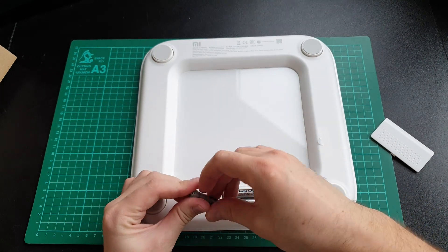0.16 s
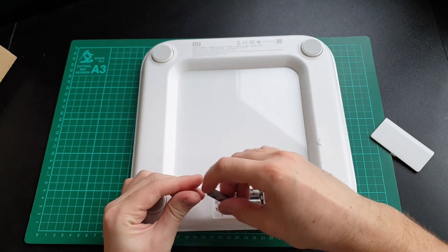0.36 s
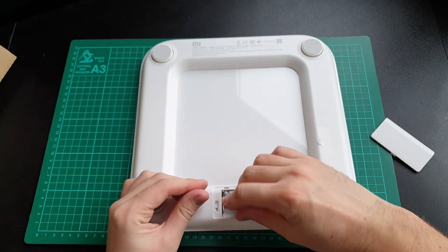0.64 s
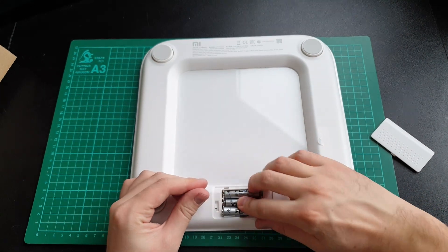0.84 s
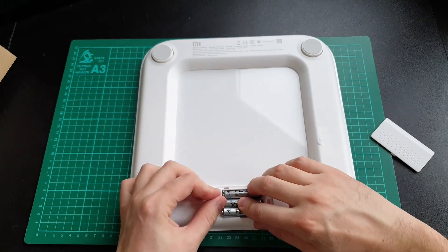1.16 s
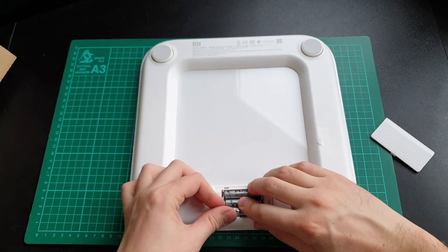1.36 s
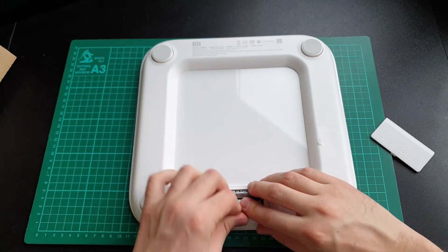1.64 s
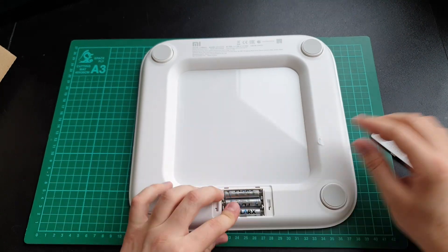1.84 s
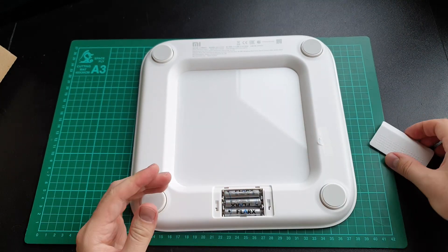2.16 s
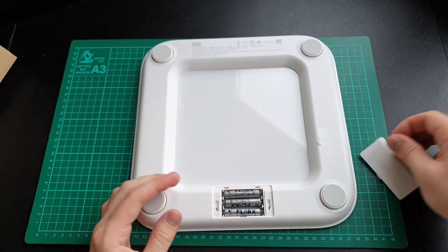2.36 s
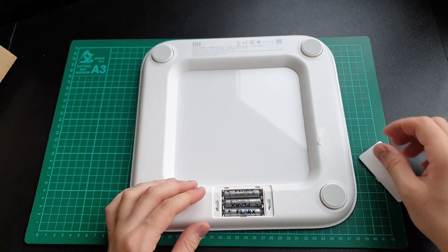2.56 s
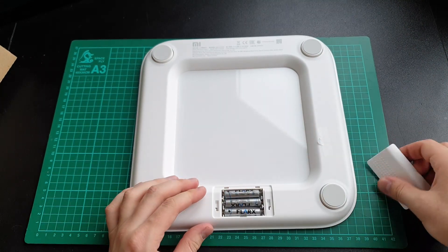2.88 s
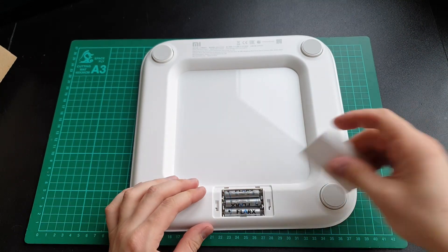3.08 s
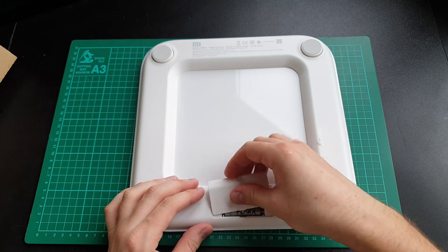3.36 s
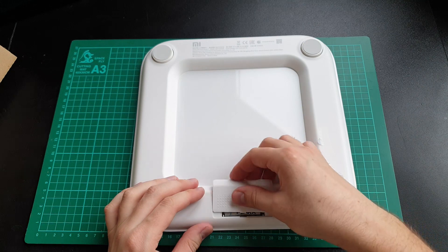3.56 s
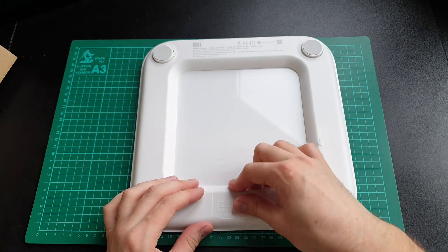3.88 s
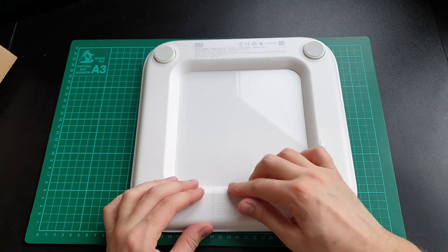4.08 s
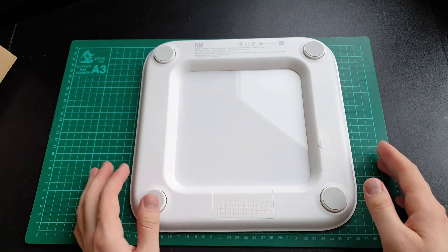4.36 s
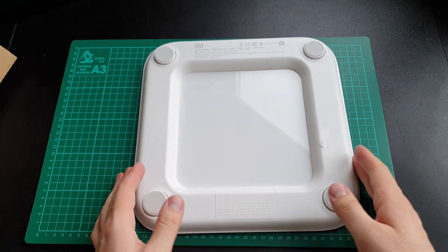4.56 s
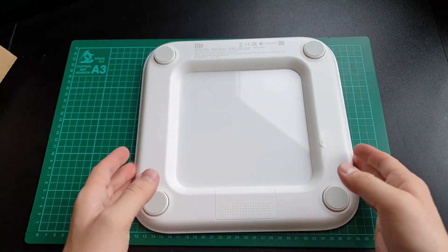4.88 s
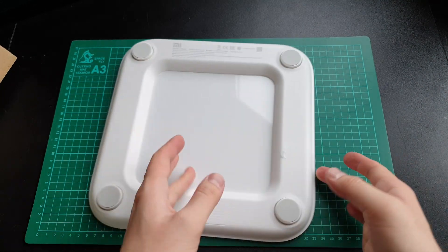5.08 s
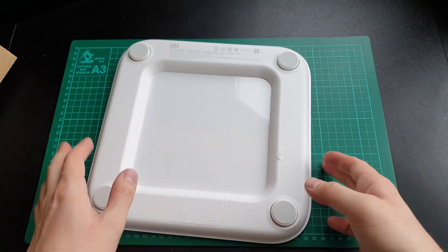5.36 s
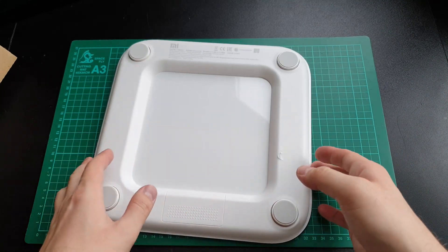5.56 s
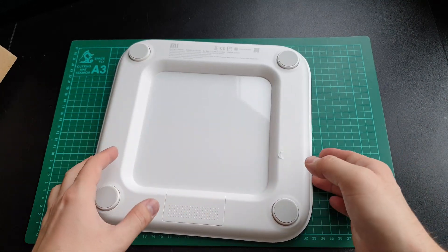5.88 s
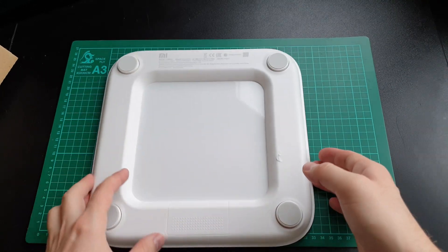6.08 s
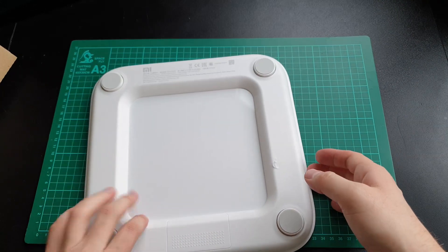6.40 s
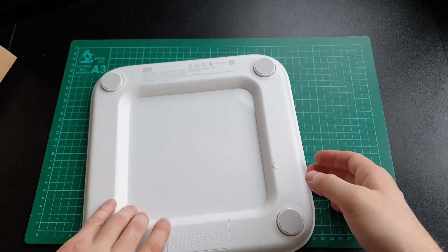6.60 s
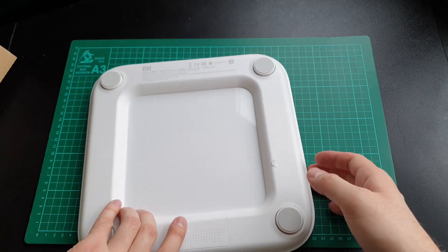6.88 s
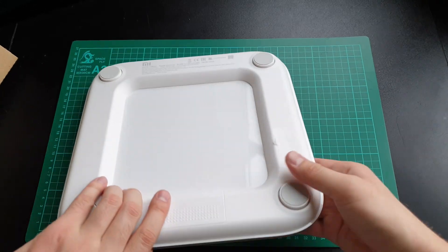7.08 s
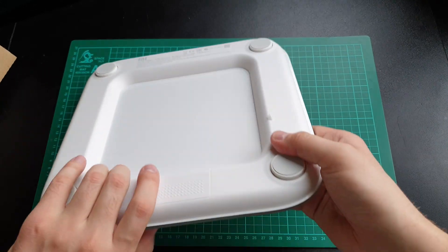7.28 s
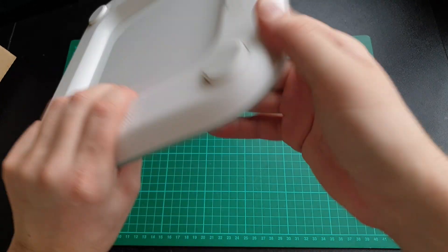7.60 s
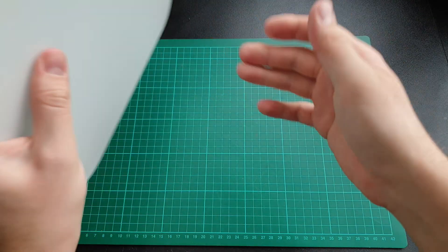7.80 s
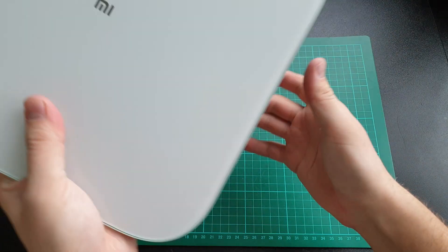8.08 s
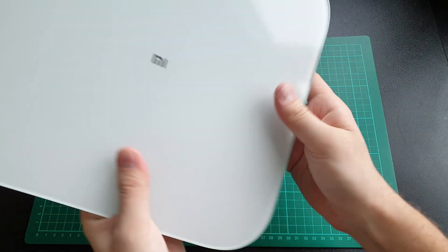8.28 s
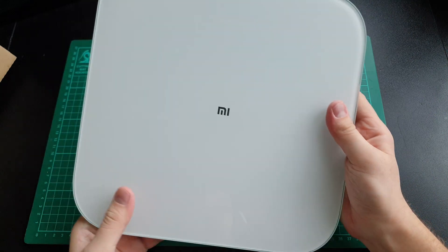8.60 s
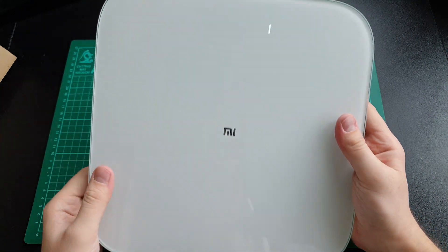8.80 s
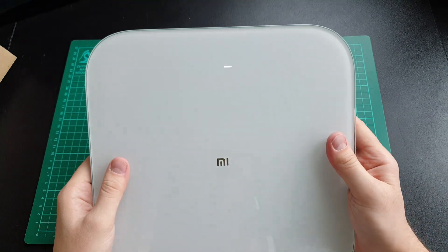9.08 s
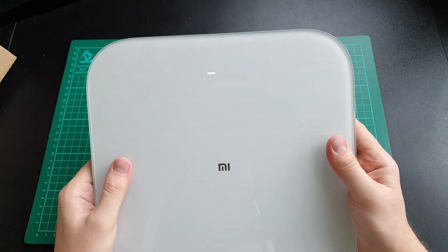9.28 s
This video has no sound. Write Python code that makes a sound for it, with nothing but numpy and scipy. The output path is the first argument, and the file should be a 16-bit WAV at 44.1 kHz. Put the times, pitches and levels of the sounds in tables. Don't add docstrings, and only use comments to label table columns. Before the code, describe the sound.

A close stereo microphone in a small room, with short echoes, faint hiss and low desk tremble. At 0.5 s a battery clicks in a hollow plastic shell, and at 0.7 s comes the loudest, hard springy snap. Smaller clicks follow, with brighter snaps at 1.5 and 1.7 s, and fingers rubbing near 2 s. At 2.25-2.4 s a thin lid is picked up in quick bright taps; light ticks and a swish reach 2.9 s. The lid is fitted from 3.3 s, clicks at 3.5 s and snaps loudly shut at 3.9 s. Around 4.6-5.1 s the case scrapes and bumps dully; at 5.65 s a rubber foot judders briefly on the mat. Soft rubbing and faint bumps continue. At 7.6 s a swish marks the lift, then rubbing and soft glassy knocks near 8.5 s, and a deep desk thump at 9 s before quiet.

```python
import sys
import numpy as np
from scipy import signal
from scipy.fft import next_fast_len
from scipy.io import wavfile
from scipy.ndimage import uniform_filter1d

SR = 44100
rng = np.random.default_rng(int(sys.argv[2]) if len(sys.argv) > 2 else 0)


def master_out(mix):
    frames = np.transpose(np.atleast_2d(mix))
    ceiling = np.clip(frames, -1, 1)
    pcm = np.round(ceiling * 32767).astype(np.int16)
    wavfile.write(sys.argv[1], SR, pcm)


def undo_db(level):
    steps = np.asarray(level, float) / 20
    return 10 ** steps


N = 416744


def evened(x):
    return x / np.sqrt(np.mean(x ** 2) + 1e-20)


def read(points, hz):
    f, value = np.transpose(points)
    return np.interp(np.log(hz + 1), np.log(f + 1), value)


def over_time(points):
    return np.interp(np.arange(N) / SR, *np.transpose(points))


def add(mix, s, sound):
    part = mix[..., round(s * SR):][..., :sound.shape[-1]]
    part += sound[..., :part.shape[-1]]


def band(x, lo_hz, hi_hz):
    edges_hz = [lo_hz, min(hi_hz, .45 * SR)]
    return signal.sosfilt(signal.butter(2, edges_hz, "band", fs=SR, output="sos"), x)


def rings(modes, length_s):
    t = np.arange(round(length_s * SR)) / SR
    total = np.zeros(len(t))
    for k, (hz, db, t60) in enumerate(modes):
        total += (-1) ** k * undo_db(db - 60 * t / t60) * np.sin(2 * np.pi * hz * t)
    return total


def struck(modes, db, upper_db=0, ring=1, rise_s=.0005):
    hit = [(hz, level + upper_db * (k > 0), t60 * ring) for k, (hz, level, t60) in enumerate(modes)]
    sound = rings(hit, .3)
    onset = 1 - np.exp(-np.arange(len(sound)) / SR / rise_s)
    return undo_db(db) * sound * onset ** 2


# pitch ratio, level in dB.
NEIGHBOURS = [(1, 0), (1.011, -3), (.984, -4), (1.029, -7), (.963, -8), (1.052, -11)]


def cluster(hz, db, t60, spread=1):
    return [(hz * ratio ** spread, db + level - 3.5, t60 * (1 - .08 * k))
            for k, (ratio, level) in enumerate(NEIGHBOURS)]


# frequency in Hz, likeness 0 to 1.
EAR_LIKENESS = [(60, 0.97), (300, 0.66), (640, 0.35), (1400, 0.027), (15000, 0.023)]


def pair(z):
    same = np.clip(read(EAR_LIKENESS, np.linspace(0, SR / 2, z.shape[1])), -1, 1)[:, None]
    return np.array([z[0], same * z[0] + np.sqrt(1 - same ** 2) * z[1]])


def noise(spectrum, size, patchy_db):
    hz = np.fft.rfftfreq(size, 1 / SR)
    used = hz < spectrum[-1][0]
    draws = rng.standard_normal((used.sum(), 4 * N // size + 5, 5), np.float32)
    a, b, c, d, patches = np.moveaxis(draws, 2, 0)
    for axis in (0, 1):
        patches = uniform_filter1d(patches, size=8, axis=axis)
    gain = undo_db(read(spectrum, hz[used])[:, None] + patchy_db * evened(patches))
    z = np.zeros((2, len(hz), a.shape[1]), np.complex64)
    z[:, used] = np.array([a + 1j * b, c + 1j * d]) * gain
    x = signal.istft(pair(z).astype(np.complex64), nperseg=size, noverlap=3 * size // 4)[1]
    return evened(x[:, :N])


def click(db, hz, crack_db, thud_db=-16.0):
    t = np.arange(2200) / SR
    air_db = -0.5 + 0.53 * crack_db + .35 * db
    rattle = rng.standard_normal((2, len(t))) * np.exp(-t / .004) * (1 - np.exp(-t / 0.00092))
    rattle[1] += (650.0 / hz) ** 3 * rattle[0]
    x = np.vstack([t == 0, rattle / np.linalg.norm(rattle, axis=1, keepdims=True)])
    peak = undo_db(np.array([[-17.], [0.], [0.]]) - 0.28 * db)
    hump = band(x, hz / 2.066, hz * 1.426) + peak * band(x, hz / 1.06, hz * 1.06)
    crack = undo_db(crack_db - 7.5) * band(x, 2400, 5500)
    air = undo_db(air_db - 17.0) * band(x, 7800, 24000)
    thud = undo_db(thud_db + 15.5) * band(x[[0, 1, 1]], 225, 560)
    return undo_db(db) * (hump - crack + air + thud) / np.linalg.norm(hump[0])


# start in seconds, peak in dB, shell pitch in Hz, sharpness in dB, weight in dB.
BATTERY_CLICKS = [(0.495, -24.5, 1296, -24.5, -13.5), (0.555, -31, 1180, -18, -54),
                  (0.689, -2.3, 1880, -13.5, -25.5), (0.76, -24, 1170, -39, -21.5),
                  (1.087, -40.5, 1050.0, -39, -12), (1.139, -33.5, 1010, -39, -42),
                  (1.343, -33, 1113, -12.5, -26), (1.543, -21.5, 1193, -2.5, -19),
                  (1.699, -17, 1450, -9.5, -14), (1.997, -43, 1220, -19, -33),
                  (2.038, -40, 1170, -21, -42.5), (2.065, -41.5, 1180, -12.5, -39)]
LID_SNAPS = [(2.248, -39, 1270, -23, -34), (2.308, -22, 2070, 1.5, -17), (2.353, -39, 960, 10, -13),
             (2.388, -21.5, 1162, 0.2, -17), (2.467, -39, 1300.0, -24.5, -12),
             (2.671, -41, 1050, -34.5, -14.5), (2.69, -44.5, 1196, 2.5, -7.5), (2.723, -32, 1087, -34, -32),
             (2.734, -35.5, 1090, -6.5, -12.5), (2.818, -47.5, 1340, -25, -7.5),
             (2.835, -45.5, 1140, -28, -36), (2.923, -43, 1580, 9, -14), (3.283, -27, 1140.0, 2.5, -27),
             (3.293, -27.5, 1314, -5, -12), (3.364, -39, 1100, -4, -30), (3.397, -35.5, 1540, -9, -28),
             (3.494, -17.5, 1560, -6.5, -53.5), (3.611, -38, 1330, 4, -52),
             (3.635, -41.5, 1297, -13.5, -20.5), (3.708, -33.5, 1060, -13, -21.5),
             (3.889, -8, 1070, -5.5, -21), (4.178, -42, 818.0, -30, -27)]
CASE_BUMPS = [(4.897, -36, 626, -9, 1.5), (4.988, -59.9, 724.0, -13.3, 4), (5.022, -35.5, 1100, -31, -21),
              (5.418, -62.5, 1281, 9.5, -10), (5.647, -44, 600, -40.5, -23),
              (5.6755, -38, 646.0, -30, -14.5), (5.704, -45, 640, -8.5, -7.5),
              (5.865, -58.5, 627, -16.5, -10.5), (6.058, -45, 585, -25.5, -21),
              (6.088, -39.5, 554, -27, -16.5), (6.198, -55.5, 1090.0, -7.5, -21),
              (6.84, -56, 1420, -25, -12), (6.927, -53, 1020, -13, -25), (7.167, -44.5, 1148, -10.5, -14),
              (7.269, -37, 1020, -29.5, -40.5), (7.465, -66, 1100, 7, -8), (8.097, -60, 2147, 14.5, -21.5),
              (8.26, -51.5, 1320.0, -5.5, -7.5), (8.368, -52, 1450.0, -13.5, -17),
              (8.494, -37.5, 1065, -2.5, -27), (9.013, -44, 1000, 0, -5)]
# start in seconds, peak in dB, pitch in Hz, sharpness in dB.
FAINT_TICKS = [(.648, -38, 1170, -21), (.662, -29.5, 1020, -35), (1.056, -59, 1000, -23),
               (1.074, -49, 1010, -25.5), (2.286, -35.5, 1240, 1), (2.379, -23.5, 1410, 4),
               (2.685, -49.5, 1360, -7.5), (2.91, -48.5, 1360, -13.5), (2.710, -39, 1400, -7),
               (3.466, -34, 1285, -5.5), (3.687, -50.5, 1300, -14)]


def shell_clicks():
    spots, near = np.zeros((3, 1, N)), np.zeros((2, N))
    for k, (s, *row) in enumerate(BATTERY_CLICKS + LID_SNAPS + CASE_BUMPS + FAINT_TICKS):
        sound = click(*row)
        add(spots[k % 3], s, sound[:1])
        add(near, s, sound[1:])
        contact = undo_db(-5.0) * sound[:1] * rng.choice([-1, 1], (2, 1))
        add(near, s + 0.0011, contact)
    return spots, near


# start
# in seconds, peak in dB, pitch in Hz, t60 in s.
MODE_PINGS = [(.506, -27.5, 1327, 0.047), (0.556, -39, 6250, 0.017), (.555, -43, 5180, 0.022),
              (.69, -17, 1830, 0.077), (0.691, -22.5, 1080, 0.087), (.69, -22.5, 3190, 0.045),
              (.69, -25, 6580, .03), (.701, -17.5, 2060, .04), (.712, -23, 2250, .03),
              (.759, -27, 1060, 0.026), (.771, -20.5, 1410, 0.024), (1.543, -27.5, 3800, .03),
              (1.543, -33.5, 4600, .03), (1.543, -38.5, 11000, 0.015), (1.699, -29, 1790, .05),
              (1.701, -27.5, 1025, 0.058), (1.702, -22, 680, 0.055), (1.7, -31, 4683, .05),
              (1.699, -25, 3325, .04), (1.699, -44, 7630, .02), (1.698, -34.5, 9540, 0.012),
              (1.912, -66.5, 6000, .02), (1.93, -67, 7090, .02), (2.241, -44, 1250, .05),
              (2.256, -31, 1200, .06), (2.311, -39, 990, .08), (2.388, -25, 1208, 0.097),
              (2.47, -39.5, 1300, .04), (2.703, -54.5, 6500, .02), (2.744, -53, 6700, 0.024),
              (2.924, -46, 5030, .06), (2.93, -42, 2230, 0.05), (.555, -45, 5770, .02),
              (0.554, -46, 6970, 0.018), (1.543, -40, 11900, .02), (1.544, -37.5, 13100, .02),
              (1.7, -36.5, 10900, 0.019), (1.699, -31, 13000, .02), (1.139, -39, 934, .06),
              (1.997, -47, 1180, .05),
              (3.283, -32.5, 6090, .03), (3.283, -31.5, 6500, .04), (3.293, -33.5, 1290, .06),
                  (3.283, -53, 3520, .04), (3.398, -36, 1600, .06), (3.408, -51, 5800, .02),
                  (3.468, -45, 3600, .04), (3.468, -55.5, 4500, .02), (3.494, -19.5, 1610, .06),
                  (3.494, -30.5, 1200, .06), (3.494, -32.5, 1010, .05), (3.494, -31, 5700, .05),
                  (3.494, -30.5, 3380, .03), (3.553, -48, 1300, .03), (3.606, -51, 1000, .03),
                  (3.612, -50.5, 2900, .04), (3.889, -17, 1020, .05), (3.889, -14.5, 1810, .04),
                  (3.889, -26, 6600, .04), (3.889, -25.5, 1600, .04), (3.895, -18.5, 2300, .05),
                  (3.908, -29.5, 2950, .02), (3.9, -28.5, 3400, .02), (3.895, -23, 3270, .04),
                  (3.889, -27, 12000, .05), (3.889, -28.5, 4000, .04), (4.178, -49, 904, .04),
                  (3.708, -42.5, 1097, 0.041), (4.938, -42, 250, .06), (4.919, -33, 320, .05),
                  (5.4, -44, 239.3, .06), (4.13, -59, 1230, .05), (4.897, -43, 4800, .02),
                  (4.897, -32.5, 1340, .03), (4.939, -44, 990, .03), (4.988, -34, 1000, .03),
                  (5.018, -38.5, 1104, .05), (5.06, -44.5, 912, .04), (7.2, -64.5, 1200, .03),
                  (7.465, -62, 2300, .08), (9.015, -59, 2300, .04), (9.026, -27, 300, .08),
                  (5.36, -55, 600, .04), (9.016, -49, 590, 0.073), (8.497, -40, 1800, 0.038)]


def pings():
    out = np.zeros((1, N))
    for s, db, hz, t60 in MODE_PINGS:
        longest_s = .03 * min(1, 5000 / hz) if hz > 2400 else .08
        add(out, s, rings(cluster(hz, db, min(t60, longest_s)), 0.091)[None])
    return out


# frequency in Hz, level in dB, t60 in s.
LID_MODES = [(1900, 2, 0.047), (2440, 6, .037), (4462, 12.5, .08), (5030, 10, 0.1), (6350, 9, .07),
             (7600, 0.5, 0.14), (8300, -2, 0.02), (9860, -0.5, 0.083), (10960, -1, .05), (11750, 6, 0.05),
             (12410, 1, 0.11), (13350, 3.5, .06), (14400, 0, 0.056), (15400, -1, .04)]
# start in seconds, peak in dB.
LID_HITS = [
    (2.2864, -49.5),
    (2.3087, -25),
    (2.3531, -34.5),
    (2.3795, -19.5),
    (2.3875, -20.5),
    (2.9238, -40.5),
]


def lid_taps():
    out = np.zeros((1, N))
    for s, db in LID_HITS:
        modes = []
        for hz, level, t60 in LID_MODES:
            hz *= 1 + 0.0054 * rng.uniform(-0.61, 1)
            level -= 14.0 * rng.random()
            modes += cluster(hz, level, min(t60, .065), spread=.45)[:4]
        add(out, s, struck(modes, db - 11.5)[None])
    return out


# frequency in Hz, level in dB, t60 in s.
GLASS_MODES = [(396, 15.5, 0.13), (1000, 8, 0.11), (1090, 2.5, 0.087), (1300, -11, 0.076)]
# start in seconds, level in dB, upper modes in dB above.
GLASS_HITS = [
    (8.262, -70, -5.5),
    (8.495, -62, 5),
    (8.529, -50, 1),
    (8.604, -73.5, 19),
    (8.653, -81.5, 16),
]


def glass_knocks():
    out = np.zeros((1, N))
    for s, db, upper_db in GLASS_HITS:
        add(out, s, struck(GLASS_MODES, db, upper_db, rise_s=0.0029)[None])
    return out


# frequency in Hz, level in dB, t60 in s.
FOOT_MODES = [(600, 0, .025), (2400, -4, .011), (3300, -10, .008)]
# start in seconds, level in dB.
FOOT_SLIPS = [
    (5.6388, -62),
    (5.6468, -57),
    (5.6553, -55),
    (5.6638, -53),
    (5.6752, -48),
    (5.6877, -49),
    (5.7042, -47),
]


def foot_judder():
    out = np.zeros((1, N))
    for s, db in FOOT_SLIPS:
        add(out, s, struck(FOOT_MODES, db)[None])
    return out


# frequency in Hz, level in dB, t60 in s.
DESK_MODES = [(59, 0.5, 0.5), (78.4, -2, .2), (121.95, 8, 0.26), (232, -4, 0.097)]
# start in seconds, peak in dB, upper modes in dB above.
DESK_PUSHES = [(0.692, -43.5, -5.5), (0.777, -60, 5.5), (1.545, -35, -12), (1.696, -44.5, 1),
               (1.939, -59, -27), (2.402, -64, 6.5), (2.716, -64, 4), (3.709, -62, -8.5), (3.889, -48, 6),
               (4.436, -46, -10.5), (4.529, -57.5, -1), (4.669, -57.5, -3), (4.717, -54, -5.5),
               (4.9, -38, 1.5), (4.977, -37.5, -6.5), (5.062, -41, -6), (5.427, -52, 0.5),
               (5.658, -68, 10.5), (6.225, -53, -12), (6.448, -42.5, -11.5), (6.52, -52, -11.5),
               (6.849, -67, 4.5), (7.165, -51.5, 11), (7.24, -49, -22), (8.267, -59.5, 0.5),
               (9.022, -28.5, 1.5), (9.299, -67.5, 0)]


def desk_thumps():
    desk = np.zeros(N)
    for s, db, upper_db in DESK_PUSHES:
        ring = .56 - 0.0074 * (db + 48.5)
        add(desk, s - .007, struck(DESK_MODES, db + 9.5, upper_db, ring, rise_s=.013))
    turn = np.exp(1j * np.array([[-.2], [.2]]))
    return (signal.hilbert(desk, next_fast_len(N))[:N] * turn).real


def strokes(rows, fall_db_per_s, gritty=0):
    t = np.arange(0, N + 64, 64) / SR
    power = np.full(len(t), 1e-11)
    for s, rise_s, hold_s, db, *grit in rows:
        early = np.maximum(s - t, 0) / rise_s
        late_s = np.maximum(t - s - hold_s, 0)
        power += undo_db(db + gritty * sum(grit) - 25 * early - fall_db_per_s * late_s) ** 2
    return np.interp(np.arange(N) / SR, t, power)


# time in seconds, delay in ms.
LIFT_ECHO = [
    (7.42, .87),
    (8.0, 0.93),
    (8.2, 0.21),
    (8.6, 0.19),
    (9.0, 0.125),
]


def lifted(x):
    echo_share = .4
    s, ms = np.transpose(LIFT_ECHO)
    n = np.arange(round(s[0] * SR), round(s[-1] * SR))
    source = n - np.interp(n / SR, s, ms) * SR / 1000
    out = x.copy()
    for ear in out:
        ear[n] = (ear[n] + echo_share * np.interp(source, n, ear[n])) / np.hypot(1, echo_share)
    return out


# full at in seconds, rise in s, hold in s, level in dB.
FINGER_SWISHES = [(1.12, .08, .1, -76.5), (1.535, 0.064, 0.015, -65.5), (1.64, .05, 0.016, -67),
                  (1.92, .02, 0, -74), (2.064, 0.074, 0, -60), (2.26, 0.033, 0.12, -52),
                  (2.919, 0.035, 0.027, -53.5), (3.06, .06, 0, -60.5), (3.2, .1, 0, -71),
                  (4.44, 0.28, 0.12, -68.5), (4.8, 0.23, 0.047, -59.5), (4.9, 0.023, 0.2, -56),
                  (5.05, 0.082, .02, -50), (5.32, .15, 0.042, -72), (5.45, .08, 0.0097, -65.5),
                  (5.71, 0.092, 0, -65), (6.331, 0.31, 0, -67), (6.45, .12, 0, -65.5),
                  (6.571, 0.21, 0.0039, -59.5), (7.3, 0.14, 0.058, -62.5), (7.585, 0.057, 0.001, -46.5),
                  (7.82, 0.05, 0, -66), (7.9, .05, .03, -69), (8.439, 0.19, 0.056, -47.5),
                  (8.69, 0.26, 0.26, -56.5), (9.03, 0.12, 0, -58.5), (9.2, .2, .25, -81)]
EDGE_SCUFFS = [(1.53, .08, 0.059, -60, -12.5), (1.62, .05, 0.086, -61, -3), (1.9, 0.13, 0.05, -67, -13),
               (2.02, 0.051, 0.077, -53, -12), (2.26, .03, 0.012, -44.5, -18),
               (2.36, 0.098, 0.033, -60, 0.5), (2.919, 0.018, 0.0079, -58, 8.5), (4.02, .04, .07, -73, 13),
               (5.49, .06, .13, -71, -19.5), (5.9, 0.17, 0.15, -78, -1.5), (6.45, .08, 0.13, -70, -4.5),
               (6.93, .05, 0.042, -70, -1.5), (7.175, 0.093, 0.037, -66, -5.5),
               (7.55, 0.45, 0.094, -72.5, -9), (7.75, .2, 0.14, -81.5, -2), (8.45, .16, 0.075, -71, 19),
               (8.58, 0.089, 0.16, -64, -25), (8.7, 0.09, .27, -85.5, 17.5), (8.27, .01, .06, -76, 12),
               (7.59, 0.042, 0.0081, -73.5, 5.5), (9.2, .2, .25, -73.5, -6.5)]
MAT_DRAGS = [(4.64, 0.097, 0.13, -61.5, -27), (4.79, 0.12, .08, -55, 0), (5.05, .06, .03, -62, 10),
             (4.9, 0.018, 0.022, -47.5, -16), (4.96, .1, 0.12, -52.5, -1.5), (5.45, .15, 0.038, -68.5, -5),
             (5.651, 0.025, 0.048, -54, -9), (5.715, 0.05, 0, -46.5, -10), (6.08, 0.03, .025, -58, -13),
             (6.2, .2, 0.064, -71.5, -2.5), (6.85, 0.06, 0.00081, -74.5, 10), (7.3, 0.03, .02, -63.5, -3),
             (8.27, .05, 0.054, -71, -4.5), (8.51, .07, 0.049, -77, -4), (9.031, 0.024, 0.024, -53, -17)]
# frequency in Hz, level in dB per Hz.
HOLLOW_COLOUR = [(500, -50), (850, -7), (1050, 2), (1250, 1), (1500, -9.5), (2500, -42)]
SCRAPE_COLOUR = [(700, -38), (1500, 0), (2500, 0.5), (3500, -6), (6500, -22)]
HISS_COLOUR = [(500, -28.5), (1500, -8.5), (3920, -3.5), (6600, 5.5), (8600, -2.5), (11500, -2.5),
               (15100, -3), (16300, -34.5)]


def rubs():
    slips = undo_db(1.6 * evened(uniform_filter1d(rng.standard_normal(N), size=150)))
    hollow = evened(noise(HOLLOW_COLOUR, 1024, 1.8) * slips)
    scrape = evened(noise(SCRAPE_COLOUR, 256, 0.92) * slips)
    drag = band(rng.standard_normal((2, N)) + 1.4 * rng.standard_normal(N), 170, 770)
    drag = evened(drag * slips)
    hiss = noise(HISS_COLOUR, 512, 2.0)
    air = evened(band(hiss, 10000, 14850))

    skin = strokes(FINGER_SWISHES, 241)
    edge = strokes(EDGE_SCUFFS, 263)
    mat = strokes(MAT_DRAGS, 290)
    grit = strokes(EDGE_SCUFFS, 263, 1) + strokes(MAT_DRAGS, 290, 0.71) + undo_db(-14.5) ** 2 * skin
    bright = skin * undo_db(-8.0 + 10 * np.log10(skin) + 51.0) ** 2

    out = np.sqrt(edge + undo_db(-7) ** 2 * mat) * hollow
    out += np.sqrt(grit) * scrape
    out += np.sqrt(skin) * hiss
    out += np.sqrt(mat + undo_db(-16.5) ** 2 * edge) * drag
    out += np.sqrt(bright) * air
    return lifted(out)


# frequency in Hz, t60 in s.
ROOM_T60 = [(100, 0.32), (500, 0.2), (900, 0.2), (1250, 0.18), (1700, 0.19), (3000, 0.17), (6000, 0.24),
            (14000, 0.18)]


def room(x):
    taps = np.zeros((2, SR // 2))
    grid = np.arange(60, SR // 2 - 12, 12)
    at = grid + rng.integers(0, 12, (2, len(grid)))
    np.put_along_axis(taps, at, rng.choice([-1., 1.], at.shape), 1)
    hz, t, z = signal.stft(taps, SR, nperseg=384)
    fall_db = -60 * t / read(ROOM_T60, hz)[:, None]
    fall = undo_db(fall_db) + undo_db(-24.5 + 0.43 * fall_db)
    tail = signal.istft(pair(z) * fall, SR, nperseg=384)[1]
    return signal.oaconvolve(x, tail / np.linalg.norm(tail[0]), axes=1)[:, :N]


# frequency in Hz, level in dB.
MIC_COLOUR = [(300, -8.5), (800, -3), (1200, 1), (1700, -1.5), (4500, -2), (7500, 7), (11500, 4.5),
              (15500, 0)]


def coloured(x):
    hz = np.fft.rfftfreq(512, 1 / SR)
    fir = signal.minimum_phase(signal.firwin2(511, hz, undo_db(2 * read(MIC_COLOUR, hz)), fs=SR))
    return signal.oaconvolve(x, fir[None], axes=1)[:, :N]


# time in seconds, left minus right in dB.
HANDS_SIDE = [(0, -4), (.7, .5), (1.35, -0.5), (1.7, -1), (2.7, -1.5), (3.001, -.5), (3.3, 0), (3.9, -0.1),
              (4.5, -1), (6.5, 0.9), (7.1, 0), (7.6, 1.5), (8.2, 0), (9.45, 0.6)]


def panned(x):
    return undo_db(over_time(HANDS_SIDE) * np.array([[.5], [-.5]])) * x


# time in seconds, level in dB.
TREMBLE_LEVEL = [(0.0, -74.5), (0.84, -72.5), (1.45, -73), (1.74, -62.5), (2.08, -77.5), (4.34, -67),
                 (4.95, -59.5), (5.21, -71), (6.58, -67), (8.89, -74.5), (9.21, -60.5), (9.45, -63)]
# frequency in Hz, level in dB per Hz.
RUMBLE_COLOUR = [(15, -38), (25, -3), (49, -0.5), (70, 4.5), (107, -3.5), (188, -12), (300, -17),
                 (420, -48)]


def desk_tremble():
    return undo_db(over_time(TREMBLE_LEVEL)) * noise(RUMBLE_COLOUR, 4096, 0.46)


# frequency in Hz, level in dB per Hz.
FLOOR_COLOUR = [(88, -32.5), (150, -4.5), (300, -13.5), (606, -18), (5000, -29), (7000, -24), (9000, -31),
                (15500, -23.5)]


def noise_floor():
    return undo_db(-76.5) * noise(FLOOR_COLOUR, 1024, 0.85)


def scene():
    spots, near = shell_clicks()
    ringing, taps = pings(), lid_taps()
    near += foot_judder()
    spots[0] += undo_db(-21) * ringing
    spots[1] += undo_db(-31) * taps
    plates = (ringing + taps + glass_knocks())[0]
    plates = np.vstack([plates, np.roll(plates, 9)])
    wet = sum(room(x) for x in spots)
    clicks = coloured(undo_db(14.0) * near + undo_db(19.5) * wet + plates)
    return panned(clicks + rubs()) + desk_thumps() + desk_tremble() + noise_floor()


def roll_off(x):
    return signal.sosfilt(signal.butter(12, 16970, fs=SR, output="sos"), x)


def record(dry):
    knee, roof = .7, .27
    cut = signal.sosfilt(signal.butter(2, 35., "high", fs=SR, output="sos"), dry)
    cut = signal.oaconvolve(cut, signal.firwin(255, 15950, fs=SR)[None], "same")
    over = np.maximum(abs(cut) - knee, 0)
    mix = cut - np.sign(cut) * (over - roof * np.tanh(over / roof))
    return roll_off(mix)


dry = scene()
out = record(dry)
master_out(out)
```